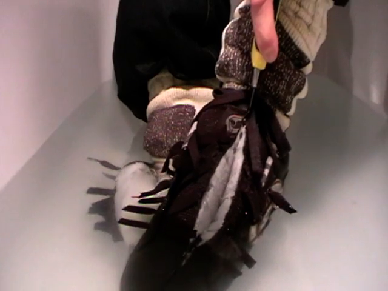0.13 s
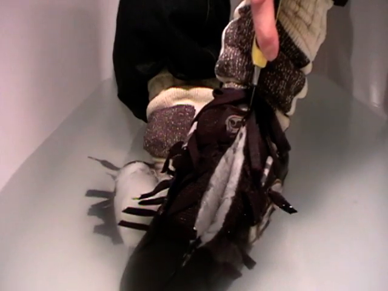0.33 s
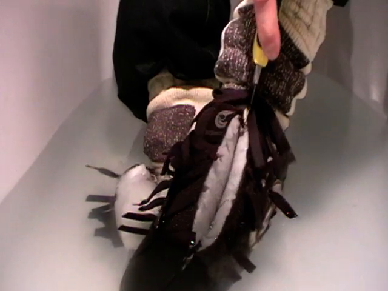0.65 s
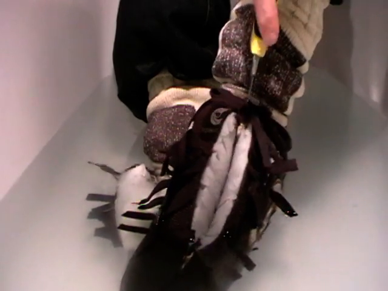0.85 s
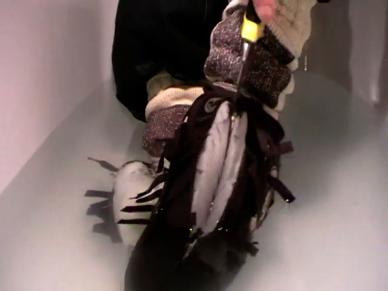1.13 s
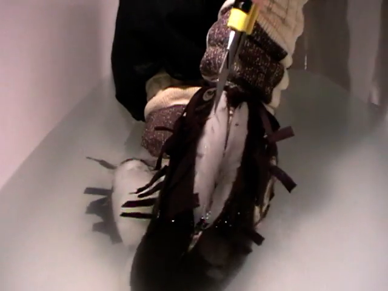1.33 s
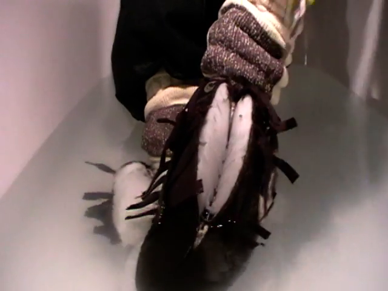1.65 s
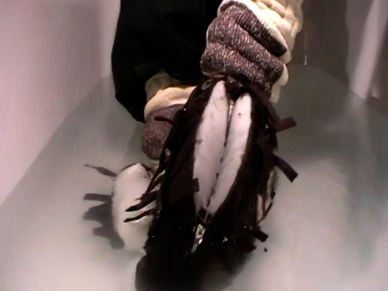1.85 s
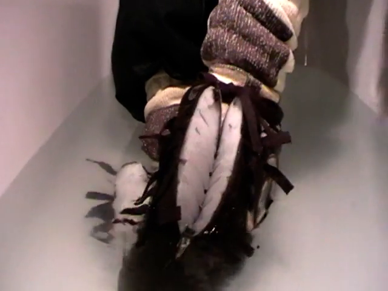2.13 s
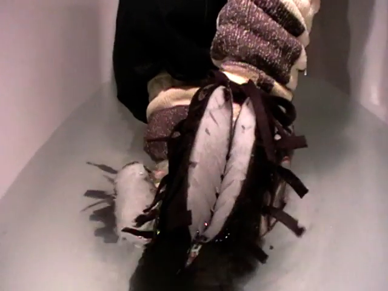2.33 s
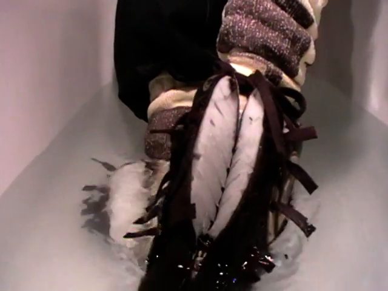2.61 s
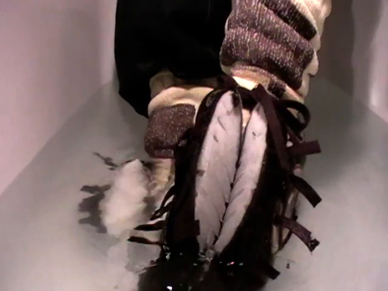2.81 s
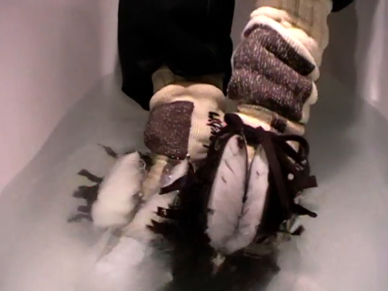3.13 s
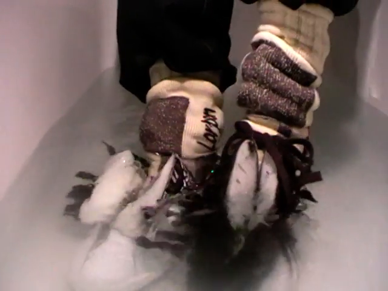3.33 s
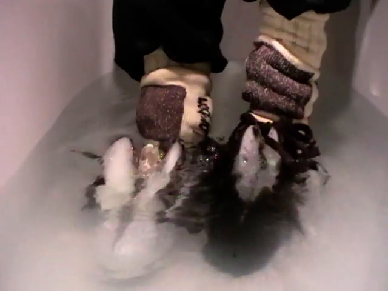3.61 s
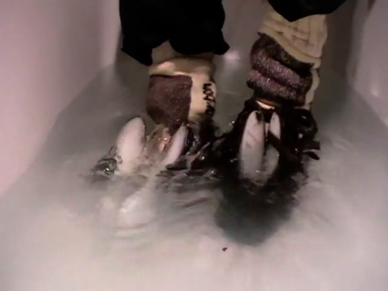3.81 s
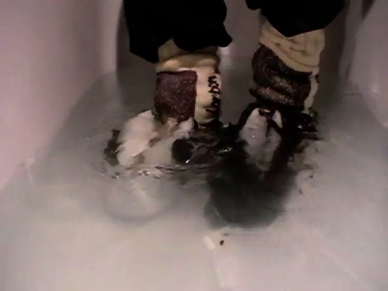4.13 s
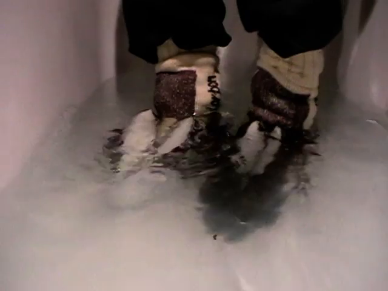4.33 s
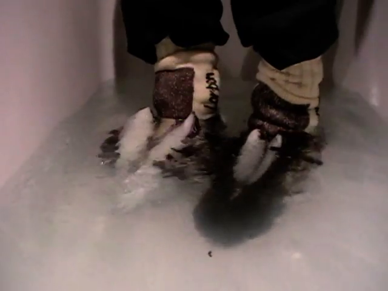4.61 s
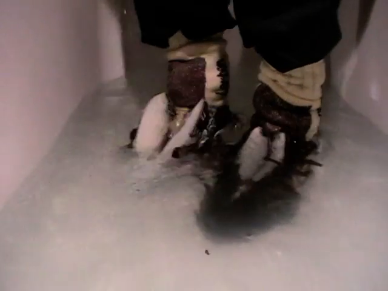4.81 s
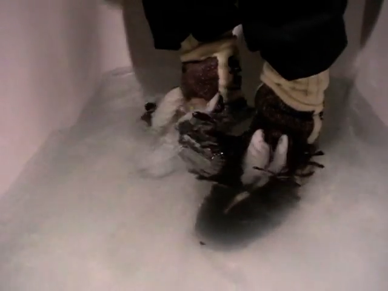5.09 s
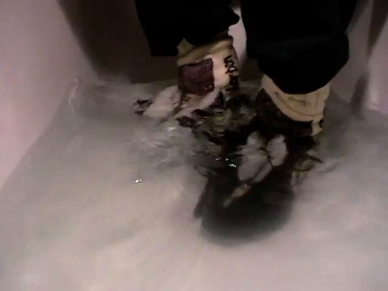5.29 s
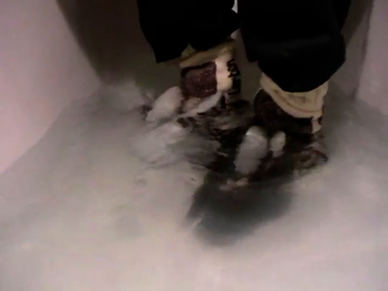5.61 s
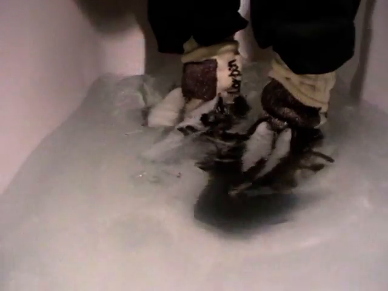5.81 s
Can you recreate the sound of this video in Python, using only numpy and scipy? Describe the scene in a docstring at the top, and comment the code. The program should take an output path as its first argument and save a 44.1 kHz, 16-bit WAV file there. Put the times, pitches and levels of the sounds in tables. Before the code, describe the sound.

Close handheld camera sound in an echoing bathroom: fabric snaps, drip ticks, small sloshes and popping air pockets from waterlogged shoes. The plops crowd together midway as a foot lands under water. Then a coarse low electric buzz begins and stays, with a short high rubber squeak over it, deep tub thuds, fine spray, and finally a loud bouncing wet slap on the tub. Soft hiss and rumble lie beneath.

```python
"""In a tiled bathroom, soaked shoes shift and step in a shallow bath. Fabric snaps and drips tick as noise cracks,
air pockets plop as rising damped sines, water sloshes as bubbles on noise, a wet sole squeaks in wavering harmonics,
feet thud as decaying sines and one slaps the tub, ringing its modes. A hand camera hears it through two close ports;
boom, hiss and mains hum lie below, its tape drive whines in thin lines and its zoom motor starts to buzz."""
import sys
import numpy as np
from scipy import signal
from scipy.fft import rfft, irfft
from scipy.io import wavfile

SR = 44100
rng = np.random.default_rng(int(sys.argv[2]) if len(sys.argv) > 2 else 0)


def int16_out(signal):
    """Quantize to a 16-bit WAV file."""
    q = np.round(np.clip(np.atleast_2d(signal).T, -1, 1) * 32767)
    wavfile.write(sys.argv[1], SR, q.astype(np.int16))


N = 262395
T = np.arange(N) / SR
HZ = np.fft.rfftfreq(N, 1 / SR)


def from_db(db):
    """Gain of a level in dB."""
    return 10 ** (np.asarray(db) / 20)


def rms_one(x):
    """Scale to rms 1."""
    return x / np.sqrt(np.mean(x ** 2) + 1e-20)


def in_time(rows, silent=None):
    """Columns of a curve table, sample by sample."""
    s, *columns = np.transpose(rows)
    return [np.interp(T, s, c, silent, silent) for c in columns]


def at_hz(rows, hz):
    """Columns of a spectrum table, read on a log-frequency axis."""
    f, *columns = np.transpose(rows)
    return [np.interp(np.log(hz + 1), np.log(f), c) for c in columns]


def shaped(x, spectrum):
    """Noise or grains given a spectrum; rms 1."""
    return rms_one(irfft(rfft(x) * from_db(at_hz(spectrum, HZ)[0]), N))


def drift(rate_hz):
    """Random wander with spread 1, weaker above rate_hz."""
    return rms_one(irfft(rfft(rng.standard_normal(N)) / (1 + (HZ / rate_hz) ** 2), N))


def resonance(x, hz, width_hz):
    """Two-pole ring, gain about 1 on top."""
    r = np.exp(-np.pi * width_hz / SR)
    top = (1 - r * r) / 2
    return signal.lfilter([top, 0, -top], [1, -2 * r * np.cos(2 * np.pi * hz / SR), r * r], x)


def lowpass(x, hz):
    """Dull a sound above hz."""
    return signal.sosfilt(signal.butter(2, hz, fs=SR, output="sos"), x)


def highpass(x, hz, order=2):
    """Thin a sound below hz."""
    return signal.sosfilt(signal.butter(order, hz, "high", fs=SR, output="sos"), x)


def add(out, s, x):
    """Mix a short sound in at s seconds."""
    i = round(s * SR)
    out[i:i + len(x)] += x[:N - i]


def swell(s, db, rise_s, fall_s):
    """Gain that climbs to a peak at s and sinks again, 20 dB per rise or fall time (at least 3 ms)."""
    rise = (s - T) / max(rise_s, .003)
    fall = (T - s) / max(fall_s, .003)
    return from_db(db - 20 * np.maximum(rise, fall))


# hiss spectrum, relative: pitch_hz, level_db (per Hz)
HISS_SPECTRUM = [(20, 7), (200, 1.5), (300, 8), (650, 2.5), (1000, -2), (2000, -4), (3000, -8), (4000, -4),
                 (7000, -8), (9500, -10), (12500, -11), (16500, -10.5)]


def hiss():
    """Steady shaped noise, independent at each port."""
    level_db = -62
    return from_db(level_db) * np.array([shaped(rng.standard_normal(N), HISS_SPECTRUM) for side in "LR"])


def mains_hum():
    """The mains hum of the house: one low sine that wavers in level."""
    hum_hz, level_db = 99.5, -64
    return from_db(level_db) * from_db(2.5 * drift(16.0)) * np.sqrt(2) * np.sin(2 * np.pi * hum_hz * T)


# tape drive lines: pitch_hz, level_db (rms, before wavering)
DRIVE_LINES = [(250, -79), (325, -75), (543, -87), (655, -76), (1170, -85), (1950, -89), (3898, -84),
               (5852, -88), (9749, -86), (13674, -81), (15628, -87)]


def tape_drive():
    """Thin motor lines that waver in level."""
    return sum(np.sqrt(2) * from_db(db + 2.3 * drift(14)) * np.sin(2 * np.pi * hz * T) for hz, db in DRIVE_LINES)


# zoom motor lines through the casing: pitch_hz, level_db (rms, before unevenness)
MOTOR_LINES = [(325, -75.5), (375, -58), (475, -63), (525, -55), (575, -49.5), (625, -53), (675, -50.5),
               (725, -67), (775, -55.5), (825, -57), (875, -61), (925, -62.5), (975, -72), (1025, -117),
               (1075, -79), (1125, -63), (1175, -65.5), (1225, -66), (1275, -73.5), (1475, -70.5),
               (2325, -79.5), (2375, -76), (2625, -83), (2675, -76), (2725, -77.5), (2775, -69),
               (2825, -64.5), (2875, -71), (2925, -73.5), (2975, -75), (3025, -76)]
# the casing hardly answers between its two low resonances: pitch_hz, level_db
CASING_DIP = (750, -74)


def zoom_motor():
    """Steps of alternate sign leave only odd multiples of the turn rate; the casing rings on after each."""
    turns_per_s, start_s, step_s = 25, 3.642, 3.6656   # step_s: time of one step
    jolt_s, body_s = .0105, .0007   # lead of the first step; the heavy body follows the tick of the gear
    grid = np.arange(0, SR / 2 + 1, turns_per_s)
    casing = sorted(MOTOR_LINES + [(100, -102), CASING_DIP, (3600, -100)])
    log_gain = np.log(from_db(at_hz(casing, grid)[0]))
    # a passive casing answers only after the step: its phase follows from its level
    cepstrum = irfft(log_gain)
    cepstrum[1:len(grid) - 1] *= 2
    cepstrum[len(grid):] = 0
    phase = rfft(cepstrum).imag
    steps = 0
    for hz, db in MOTOR_LINES:
        k = 2 * int(hz / (2 * turns_per_s)) + 1   # odd multiple
        since_step = T - step_s - body_s * (hz < 2000)
        line = np.cos(2 * np.pi * k * turns_per_s * since_step + phase[k])
        steps = steps + np.sqrt(2) * from_db(db) * line
    uneven = 1 + .08 * drift(40)   # no two steps are quite alike
    stronger_back = 1 + 0.099 * np.cos(2 * np.pi * turns_per_s * (T - step_s))   # every second step is harder
    buzz = steps * uneven * stronger_back
    # the first step comes about half a beat early
    jolt = np.roll(buzz, -round(jolt_s * SR)) * (T > start_s - jolt_s) * (T < start_s)
    return buzz * np.clip((T - start_s) / .002, 0, 1) + .8 * jolt


# weight shifts that set tub and room booming: peak_s, level_db, fall_s (per 20 dB)
WEIGHT_SHIFTS = [(0.4, -62.5, 0.65), (0.66, -55.5, 0.5), (1.23, -54, 0.16), (1.74, -56.5, 0.3),
                 (1.99, -53.5, 0.2), (2.15, -51.5, 0.1), (2.37, -54.5, .5), (2.88, -63, 0.5),
                 (3.2, -53.5, -1), (3.359, -46.5, -1.4), (3.5, -46.5, 0.32), (3.69, -53, 0.68),
                 (3.84, -56.5, 2.25), (4.04, -71, -0.4), (4.5, -43.5, .5), (5.24, -54, 0.5),
                 (5.42, -60, 0.5), (5.581, -41.5, 0), (5.7, -46, 0.1), (5.92, -49.5, .5)]


def weight_shifts():
    """Gain of the boom: a swell over a quiet floor for every shift of weight."""
    rise_s, floor_db = 0.094, -71
    return from_db(floor_db) + sum(swell(s, db, rise_s, fall) for s, db, fall in WEIGHT_SHIFTS)


# room and tub boom bands: pitch_hz, width_hz, level_db (relative)
BOOM_BANDS = [(35.8, 1.1, -4), (65, 3.45, -0.5), (97.2, 4.4, -9.5)]


def boom(shake):
    """Tub and room resonate below the water, swelling with each weight shift."""
    bands = sum(from_db(db) * rms_one(resonance(rng.standard_normal(N), hz, width))
                for hz, width, db in BOOM_BANDS)
    return shake * rms_one(bands)


def capsule_shake(shake):
    """Each capsule shakes a little on its own: separate low noise that follows the boom."""
    own = [rms_one(resonance(rng.standard_normal(N), 57, 64)) for side in "LR"]
    return from_db(-9.5) * shake * np.array(own)


def bubbles(per_s, low_hz, high_hz, cycles, spread_db):
    """Small bubbles burst at random and ring a few cycles, each in one of 16 pitches."""
    sizes = from_db(spread_db * np.minimum(rng.exponential(1, N), 5)) * rng.choice([-1, 1], N)
    born = sizes * (rng.random(N) < per_s / SR) + 1e-18
    dealt = rng.integers(0, 16, N)
    pitches = np.geomspace(low_hz, high_hz, 16)
    return sum(resonance(born * (dealt == k), hz, hz / cycles) for k, hz in enumerate(pitches))


# slow stir of the bath: time_s, slosh_db, extra_depth_db, spray_db
STIR = [(0.0, -96, -2, -66.5), (0.75, -81, -12, -60.5), (1.03, -75, -5, -63.5), (1.09, -63, 4, -63),
        (1.24, -56.5, 3.5, -59.5), (1.33, -80, 6, -64), (1.57, -77, 9, -64.5), (1.75, -58, 3, -60),
        (2.37, -58, 7, -61.5), (2.62, -72.5, -1, -65), (2.86, -75, 6, -65.5), (3.17, -66, 9, -64),
        (3.36, -63, -4, -57.5), (3.7, -57, 9.5, -62.5), (4.45, -57, 12.5, -62), (5.2, -56.5, 9, -59.5),
        (5.58, -61, 15.5, -62), (5.64, -70.5, 22, -63), (5.88, -62, 19, -69), (5.95, -74, 23, -63)]
# surges of water round the shoes: peak_s, rise_s, fall_s (per 20 dB), slosh_db, extra_depth_db, spray_db
SURGES = [(0.349, .09, 0.038, -49.5, 1, -60), (0.605, 0.023, 0.071, -46.5, -18, -57),
          (2.04, 0.053, 0.038, -49.5, 14, -67), (2.12, 0.079, 0.079, -58, -5, -56),
          (2.88, 0.0075, 0.025, -65, 7, -58), (3.26, 0.23, 0.038, -63, 7, -70),
          (3.48, .06, 0.027, -49, 4, -73), (3.55, .09, 0.086, -50, -18, -82),
          (3.97, 0.26, 0.07, -91, -10, -53), (5.05, 0.37, .05, -62, -9, -67),
          (5.27, 0.043, 0.13, -48, -13, -70), (5.37, 0.11, 0.05, -64, 20, -53.5),
          (5.67, 0.0056, 0.0074, -24.5, 5.5, -75), (5.72, 0.041, 0.095, -31.5, 8.5, -40.5)]
# slosh spectrum, relative: pitch_hz, level_db (per Hz)
SLOSH_SPECTRUM = [(150, -5), (300, 1), (600, 9), (1000, 7.5), (1700, 4.5), (2300, -7), (4000, -11.5)]


def slosh():
    """Bubbles on a wash of noise; heavier water sounds lower."""
    slosh_db, depth_db, _ = in_time(STIR)
    thin, heavy = from_db(slosh_db), from_db(slosh_db + depth_db)
    for s, rise, fall, db, extra_db, _ in SURGES:
        thin = thin + swell(s, db, rise, fall)
        heavy = heavy + swell(s, db + extra_db, rise, fall)
    wash = rms_one(bubbles(1500, 200, 2200, cycles=5.0, spread_db=3)) + 2.2 * rng.standard_normal(N)
    wash = from_db(0.5 * drift(2.4)) * shaped(wash, SLOSH_SPECTRUM)
    return thin * wash + (heavy - thin) * lowpass(wash, 900)


def spray():
    """Fine fizz: a dense shower of tiny bubbles over bright noise, following stir and surges."""
    fine = from_db(in_time(STIR)[2]) + sum(swell(s, db, rise, fall) for s, rise, fall, _, _, db in SURGES)
    fizz = rms_one(bubbles(6000, 3800, 29000, cycles=2.1, spread_db=5.5)) + 1.3 * rng.standard_normal(N)
    return fine * from_db(1.0 * drift(26)) * rms_one(highpass(fizz, 2600))


# foot landing under water: peak_s, level_db, rise_s, fall_s (per 20 dB)
GULPS = [(3.334, -48, 0.017, 0.042), (3.39, -54, 0.056, .1), (3.482, -43, 0.083, 0.16),
         (4.476, -44, .03, .2), (4.54, -48.5, .2, 0.05)]


def gulps():
    """A foot lands under water: a low band of noise swells and sinks."""
    band = resonance(resonance(rng.standard_normal(N), 280, 200), 286, 150)
    return sum(swell(*row) for row in GULPS) * rms_one(band)


# thin whistles, one curve each: time_s, pitch_hz, level_db
WHISTLES = [
    [(4.77, 10443, -66), (4.83, 11236, -61), (4.906, 10266, -65), (4.932, 9226, -68), (4.972, 9110, -64)],
    [(5.07, 11150, -70), (5.084, 10977, -61), (5.098, 10996, -64), (5.13, 10455, -61)],
]


def whistles():
    """Faint wavering sines, perhaps air pressed out of the wet shoe."""
    out = 0
    for rows in WHISTLES:
        pitch_hz = in_time(rows)[0] * (1 + 0.0066 * drift(200))
        level_db = in_time(rows, silent=-150)[1] + 2 * drift(60)
        out = out + from_db(level_db) * np.sin(2 * np.pi * np.cumsum(pitch_hz) / SR)
    return out


# snaps and drip ticks: start_s, level_db, centre_hz, broad_db (flat share, relative)
TICKS = [(0.28, -43, 13000, 1.5), (0.309, -31, 7850, 3.5), (0.3126, -33, 9700, 6.5),
         (0.586, -45, 12600, -15), (0.601, -39, 11900, 10), (1.9692, -52.5, 4620, 10),
         (2.152, -50, 12100, -12), (2.1729, -45, 12600, -14), (2.3712, -53.5, 3970, 6),
         (2.6877, -49.5, 8050, -15), (2.879, -50.5, 9000, 7), (2.9312, -53, 5230, -9),
         (3.2679, -53, 5670, -12), (3.282, -47, 12500, -15), (3.3036, -36.5, 4570, -8),
         (3.476, -44, 11800, -19), (3.487, -46, 3940, -12), (3.5112, -43.5, 6340, -10),
         (3.688, -51.5, 7900, 6), (3.787, -43, 5360, -11), (4.1873, -52.5, 5320, -12),
         (4.3197, -39.5, 3200, -9), (4.3966, -44.5, 5400, -7), (4.401, -43.5, 11000, 6.5),
         (4.6915, -51, 12900, -12), (4.8872, -41.5, 12500, -8), (4.958, -46.5, 9000, -7),
         (4.971, -54, 9100, -10), (5.015, -48, 5470, -10), (5.096, -47, 6340, 1), (5.134, -49, 4500, 6),
         (5.188, -39, 12900, -3.5), (5.659, -29.5, 5250, 5)]


def ticks():
    """A short noise crack around its centre over a flat share, then a faint fizz that dies away."""
    crack_t60_s, fizz_db, fizz_t60_s = 0.019, -20.5, 0.18
    out, t = np.zeros(N), T[:6000]
    decay = from_db(-60 * t / crack_t60_s) + from_db(fizz_db - 60 * t / fizz_t60_s)
    for s, db, hz, broad_db in TICKS:
        noise = rng.standard_normal(len(t))
        crack = rms_one(resonance(resonance(noise, hz, .35 * hz), hz, .35 * hz))
        crack = crack + from_db(broad_db) * resonance(noise, 5600, 10400)
        add(out, s, from_db(db) * crack * decay)
    return out


def pocket(db, hz, t60, octaves_per_s):
    """A damped sine that rises, at most a little over an octave."""
    t = T[:6000]
    phase = 2 * np.pi * np.cumsum(hz * 2 ** np.minimum(octaves_per_s * t, 1.1)) / SR
    return from_db(db - 60 * t / t60) * np.sin(phase) * (1 - np.exp(-t / 0.0014))


# air pockets closing in the water: start_s, level_db, pitch_hz (at start), smack_db (relative)
PLOPS = [(0.218, -56.5, 327, 19), (0.28, -46.5, 990, 17), (0.309, -35.5, 1430, 15.5),
         (0.312, -38.5, 840, 11), (0.6, -31, 915, 14), (1.809, -47, 620, 6), (1.829, -46, 810, 5),
         (1.966, -46, 1160, 12), (2.017, -28.5, 547, -12), (2.024, -27, 594, 1), (2.044, -50, 537, -4),
         (2.108, -35, 997, 10.5), (2.141, -52, 333, 5), (2.219, -39.5, 910, 12.5), (2.3, -43.5, 380, 9),
         (2.361, -37, 565, -8), (2.372, -40.5, 380, 14.5), (2.615, -47, 894, 7.5), (2.878, -40, 1555, 8.5),
         (2.905, -51, 1600, -2), (3.096, -44, 886, 7), (3.188, -51.5, 666, 13), (3.224, -47, 1150, 14),
         (3.257, -39.5, 1107, 14.5), (3.314, -44, 2150, 7), (3.333, -38.5, 610, 11.5),
         (3.359, -39, 336, 11.5), (3.362, -46, 1750, 5), (3.383, -42, 1740, -2), (3.385, -37.5, 1200, 12.5),
         (3.408, -35, 1160, 1), (3.431, -32, 1720, -5), (3.45, -30.5, 548, 7), (3.469, -29.5, 870, -8),
         (3.487, -40, 2660, -3), (3.489, -36, 840, 17.5), (3.505, -40, 302, 1), (3.527, -29.5, 1105, 8.5),
         (3.55, -41, 1190, 0), (3.579, -34.5, 1140, 3)]
# a bubble rising to the surface whistles up: start_s, level_db, pitch_hz (at start), t60_s, octaves_per_s
CHIRP = (3.531, -35, 1150, .09, 36)


def plops():
    """A closing air pocket smacks, then rings as a damped sine that rises while it shrinks."""
    ring_t60_s, octaves_per_s, smack_t60_s = 0.048, 4.7, 0.038
    out, t = np.zeros(N), T[:6000]
    for s, db, hz, smack_db in PLOPS:
        smack = resonance(resonance(rng.standard_normal(len(t)), 830, 1160), 890, 1200)
        smack = lowpass(smack, 2200)   # water smacks are dull
        add(out, s, pocket(db, hz, ring_t60_s, octaves_per_s))
        add(out, s, from_db(db + smack_db - 60 * t / smack_t60_s) * smack)
    add(out, CHIRP[0], pocket(*CHIRP[1:]))
    return out


# wet sole squeak: time_s, slips_per_s, level_db, overtones_db (relative)
SQUEAK = [(3.702, 2950, -44, -23), (3.733, 2960, -53, -25), (3.745, 3050, -68, -10),
          (3.762, 3300, -62, -12), (3.768, 3000, -47, 0), (3.79, 2990, -39, -7.5),
          (3.84, 3140, -39.5, -3.5), (3.895, 2990, -35.5, -6.5), (3.945, 3200, -48, 2),
          (3.966, 3100, -46.5, -1), (3.978, 2470, -41.5, -19), (4.0, 2000, -43, -17)]
# harmonics 2 to 5 of the squeak, relative: level_db
SQUEAK_HARMONICS = [-6, -7.5, -4, -10]


def squeak():
    """Rubber slips thousands of times a second; rate and grip waver, so the harmonics smear."""
    slips, _, overtones_db = in_time(SQUEAK)
    rough = np.interp(T, [3.80, 3.89, 3.96], [.01, .028, .02])   # the grip breaks up half-way
    phase = 2 * np.pi * np.cumsum(slips * (1 + rough * drift(494))) / SR
    tone = (from_db(4 * drift(120)) + .22 * drift(300)) * np.sin(phase)
    edge = sum(from_db(db) * (1 + .75 * drift(400)) * np.sin(k * phase)
               for k, db in enumerate(SQUEAK_HARMONICS, 2))
    # a second patch of rubber joins in
    chatter = resonance(resonance(rng.standard_normal(N), 3240, 460), 3800, 500)
    chatter = chatter * np.interp(T, [3.85, 3.92, 3.98], [0, 4.0, 0])
    rub = from_db(-33) * rng.standard_normal(N)
    level = from_db(in_time(SQUEAK, silent=-150)[1])
    return level * (tone + chatter + from_db(overtones_db) * (edge + rub))


# feet on the tub floor: start_s, level_db, pitch_hz, t60_s
THUDS = [(0.614, -49.5, 106, 0.13), (1.213, -46, 67.3, 0.3), (3.336, -38.5, 65, 0.61),
         (3.346, -43.5, 110.4, 0.57), (3.469, -39, 61.6, 0.2), (4.461, -30, 86, 0.16),
         (4.468, -34, 372, 0.31), (4.506, -32, 62.7, 0.5), (4.528, -31, 158, 0.11), (4.535, -37, 40.8, .6),
         (5.175, -37, 60.6, 0.34), (5.554, -32, 65, 0.49)]


def thuds():
    """A foot lands and the tub floor swings a few times: a soft-edged damped sine."""
    out, t = np.zeros(N), T[:SR // 2]
    for s, db, hz, t60 in THUDS:
        add(out, s, from_db(db - 60 * t / t60) * np.sin(2 * np.pi * hz * t) * (1 - np.exp(-t / 0.0025)))
    return out


# the slap and its bounces on the tub: start_s, level_db
SLAP_CONTACTS = [(5.66, -33), (5.663, -18), (5.670, -37), (5.677, -43), (5.692, -27.5), (5.703, -33),
                 (5.713, -26.5), (5.730, -26), (5.749, -21.5), (5.773, -29)]
# modes of the tub: pitch_hz, level_db (relative), t60_s
TUB_MODES = [(380, -10, 0.15), (567, -3, 0.013), (726.5, 3.5, 0.083), (768, 4.5, 0.053), (1200, -40, 0.088),
             (1470, -14.5, 0.036), (1630, -16, 0.086), (1840, -33, 0.074), (2500, -29, 0.037)]
# thrown water on the tub: time_s, level_db
SPLASH = [(5.657, -43), (5.661, -17), (5.743, -32.5), (5.747, -23), (5.811, -41), (5.913, -55), (5.92, -45)]


def slap():
    """Every contact strikes all modes of the tub; thrown water keeps drumming on it in between."""
    out, t = np.zeros(N), T[:12000]
    for s, db in SLAP_CONTACTS:
        for hz, mode_db, t60 in TUB_MODES:
            strike_db = db + mode_db + 0.72 * rng.standard_normal()
            add(out, s, from_db(strike_db - 60 * t / t60) * np.sin(2 * np.pi * hz * t))
    noise, drummed = rng.standard_normal(N), 0
    for k, (hz, db, t60) in enumerate(TUB_MODES):
        drummed = drummed + from_db(db) * rms_one(resonance(noise, hz, 1.9 / t60 + 60)) * (-1) ** k
    out += from_db(in_time(SPLASH, silent=-150)[0]) * rms_one(drummed)
    return highpass(out, 280)   # the thin wall moves little deep air


def bathroom(x):
    """Diffuse tiled echo: a decaying noise response."""
    t60_s, level_db = 0.32, -10.5
    t = T[:SR // 2]
    tail = rng.standard_normal(len(t)) * from_db(-60 * t / t60_s) * (t > .004)
    return from_db(level_db) * signal.fftconvolve(x, tail / np.sqrt(np.sum(tail ** 2)))[:N]


# microphone colour: pitch_hz, level_db
COLOUR = [(20, -4), (1500, -2.5), (1880, -1.5), (2050, -13.5), (2350, -6), (2600, -8.5), (3300, -0.5),
          (4600, 9), (6300, -1.5), (7500, -2.5), (9500, -7.5), (12500, -2.5), (14000, -10), (16500, 1.5)]
# the two ports: pitch_hz, balance_db (left minus right), lead_rad (how far the right leads)
PORTS = [(1390, 0.4, 0.017), (2640, 6.5, 0.66), (3110, 6, 2.5), (3480, 4.5, 2.09), (4890, -4.5, 3.2),
         (5930, -1, 4.7), (6080, -11.5, 4), (6620, -12, 3.1), (6840, -5, 2.34), (7560, 10, 3.5),
         (8520, 0.5, 5.3), (9200, 2, 6.2), (11000, 2, 6.2), (12500, 2.5, 6.95), (16000, 4, 7.9)]


def microphone(air):
    """Two ports in one casing: a common colour, and level and phase that part in the treble."""
    balance_db, lead = at_hz([(20, 0, 0)] + PORTS, HZ)
    side = np.array([[.5], [-.5]])   # left, right
    gain = from_db(at_hz(COLOUR, HZ)[0] + side * balance_db)
    return irfft(rfft(air) * gain * np.exp(-1j * lead * (side > 0)), N)


def scene():
    """Bath sounds pass room and ports; motors, hum, thuds, boom and hiss reach the capsules directly."""
    shake = weight_shifts()
    deep = highpass(boom(shake) + thuds() + mains_hum() + capsule_shake(shake), 30)
    wet = slosh() + spray() + gulps()
    hits = whistles() + ticks() + plops() + squeak() + slap()
    # echoes that differ by port; long waves reach both alike
    apart = from_db(-7) * np.array([bathroom(hits + wet) for side in "LR"])
    apart = highpass(apart, 1500, order=1)
    air = hits + bathroom(hits) + wet + apart
    return hiss() + tape_drive() + zoom_motor() + deep + microphone(air)


def record(dry):
    """The top is cut: a steep filter, 70 dB down from 16300 Hz."""
    return signal.sosfilt(signal.cheby2(16, 70, 16300, fs=SR, output="sos"), dry)


dry = scene()
out = record(dry)
int16_out(out)
```